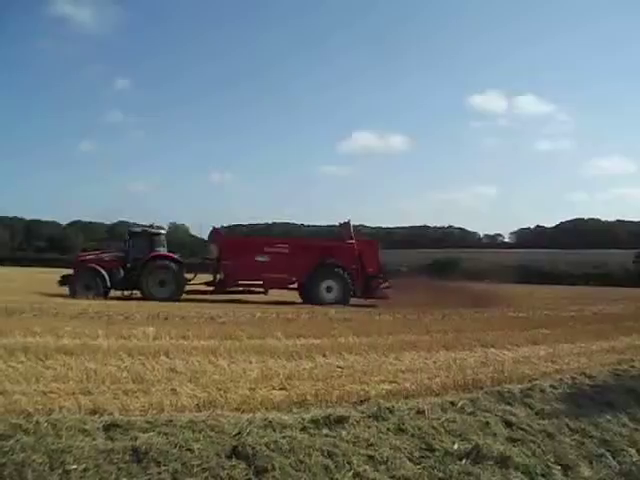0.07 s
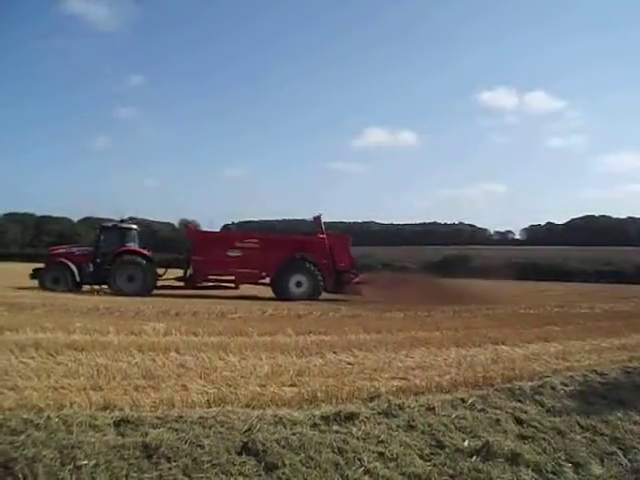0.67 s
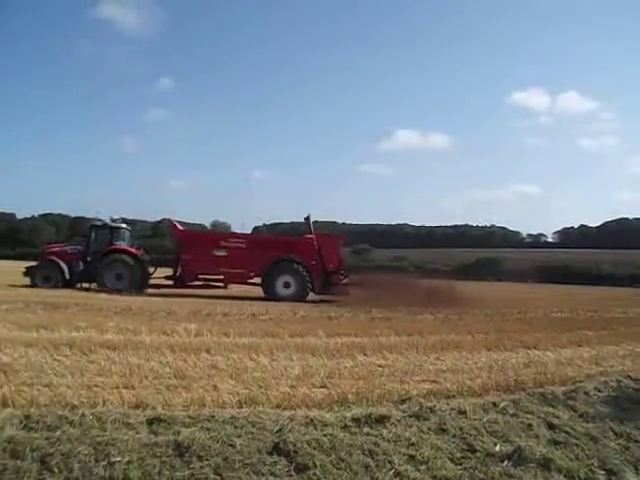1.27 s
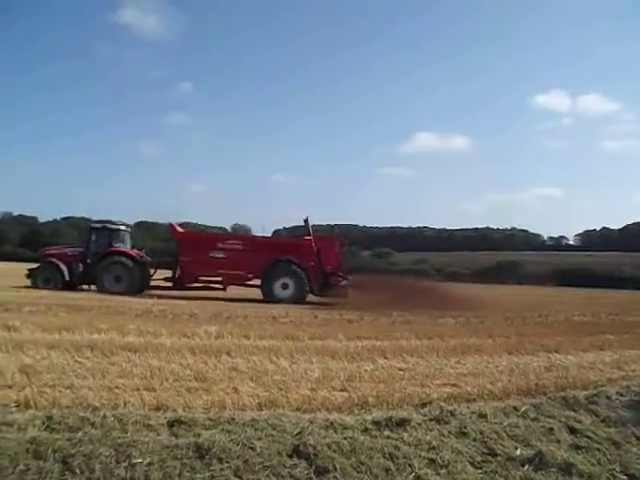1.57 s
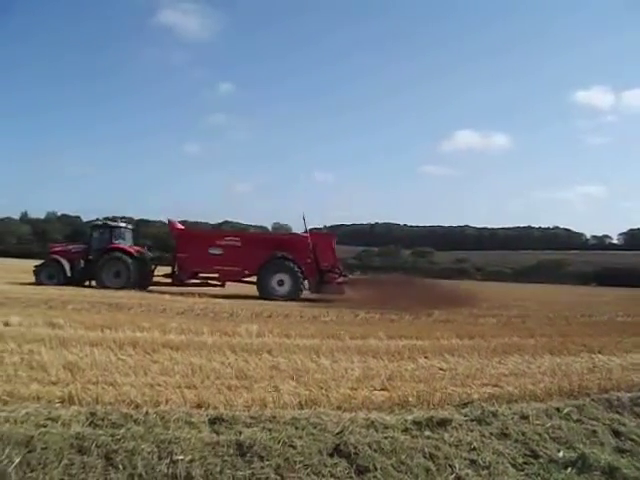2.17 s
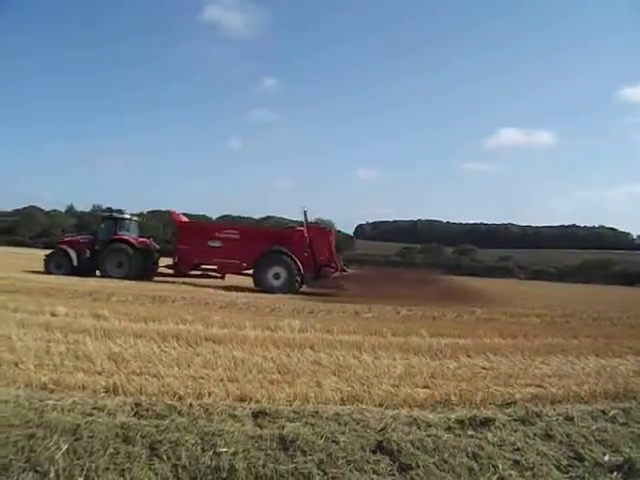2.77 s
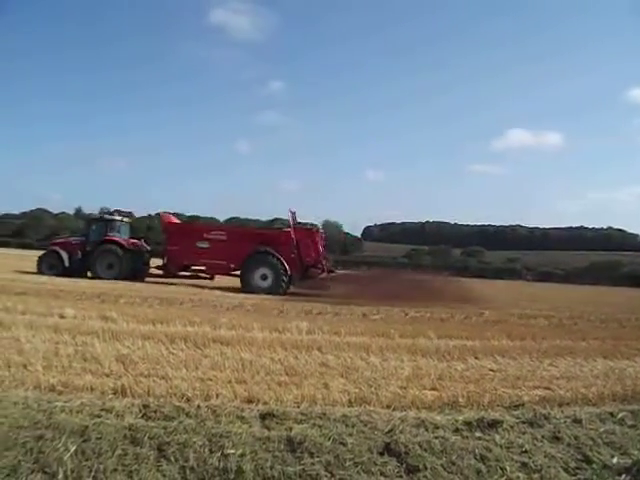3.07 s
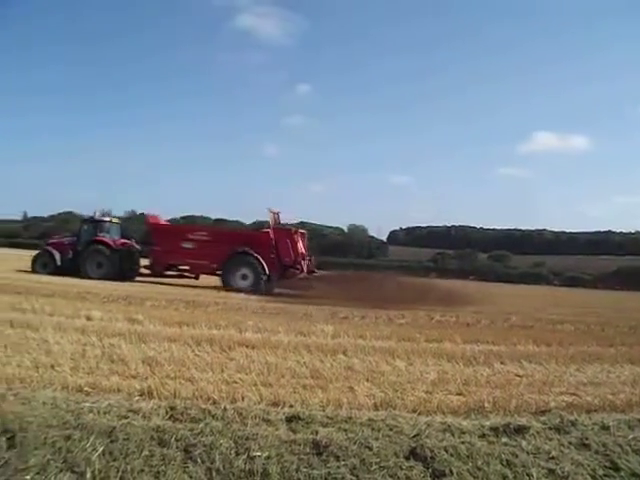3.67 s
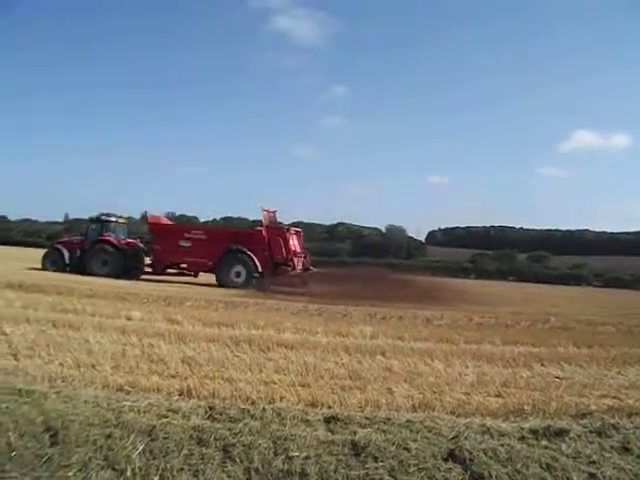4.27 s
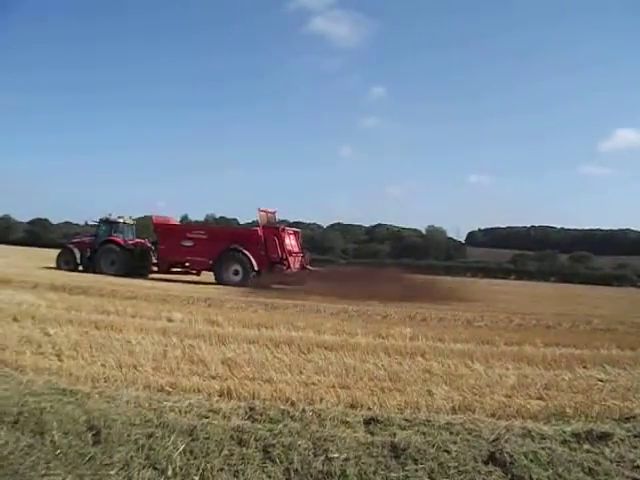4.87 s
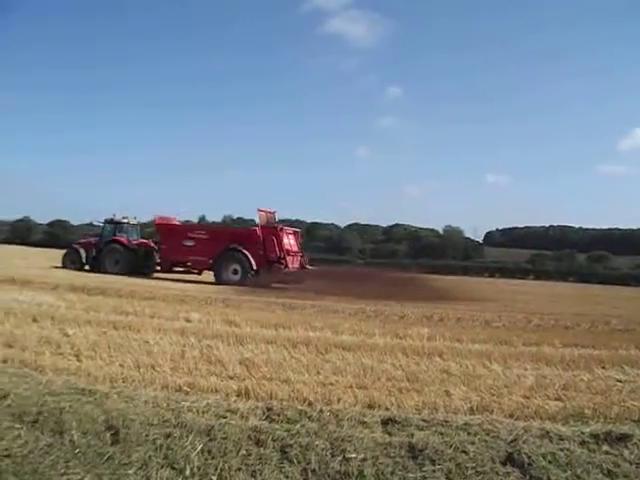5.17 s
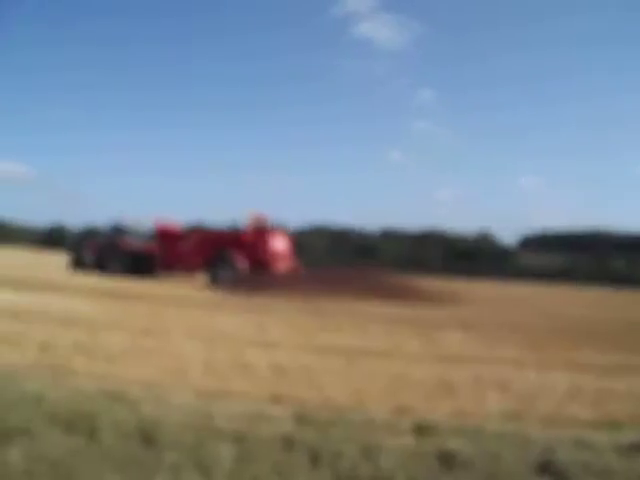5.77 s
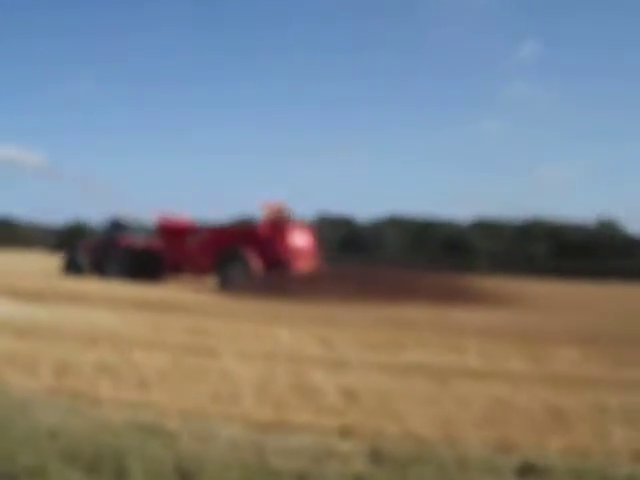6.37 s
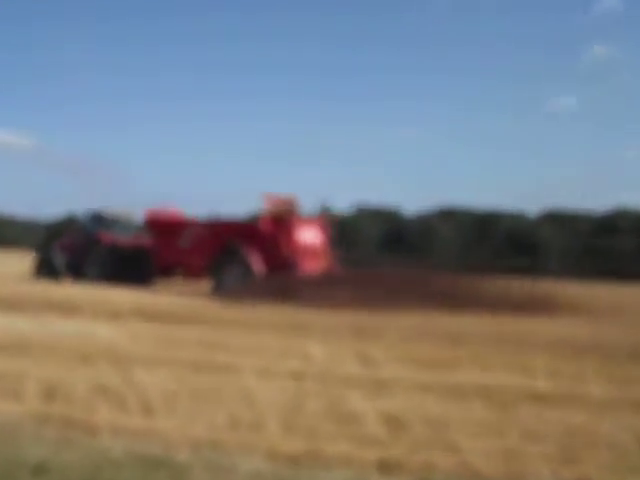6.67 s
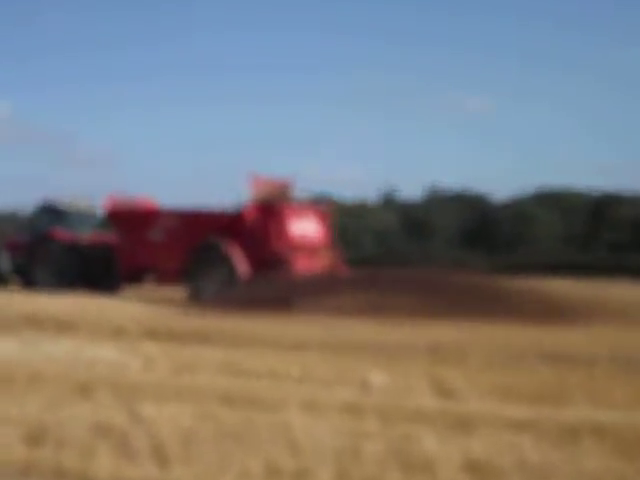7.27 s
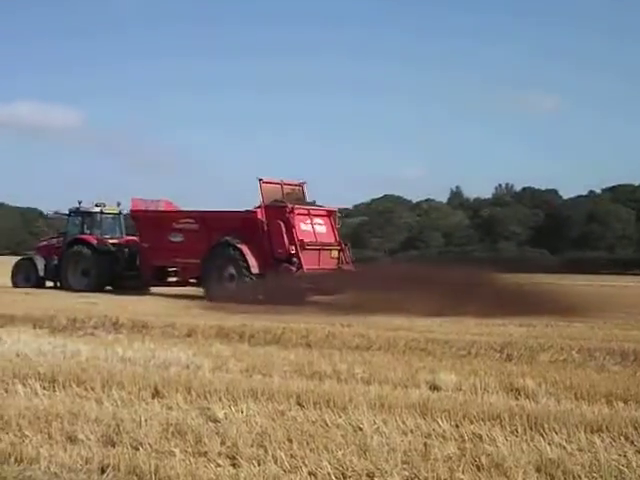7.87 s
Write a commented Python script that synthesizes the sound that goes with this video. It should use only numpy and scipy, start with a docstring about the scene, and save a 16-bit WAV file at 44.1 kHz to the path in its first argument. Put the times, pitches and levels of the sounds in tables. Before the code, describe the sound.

A tractor's diesel drone and a manure spreader's gritty roar carry across a field, with stones clacking on steel and wind on the microphone.

```python
"""A diesel drone and a gritty roar come first: a tractor tows a manure spreader over a stubble field,
about 25 m from the microphone and slowly moving away. The exhaust barks harder as the engine lugs,
gears whine, and the beaters shred the load, now and then striking a stone that makes the steel ring.
Close up, wind buffets the camera's small, dull microphone; late on, the zoom motor hisses faintly
and pebbles tick off the beaters."""
import sys
import numpy as np
from scipy import signal
from scipy.fft import rfft, irfft, next_fast_len
from scipy.io import wavfile

SR = 44100
rng = np.random.default_rng(int(sys.argv[2]) if len(sys.argv) > 2 else 0)


def to_wav(sig):
    """Store sig (one row per channel, or 1-D mono) as 16-bit WAV at the path in sys.argv[1].

    Samples outside -1..1 are clipped; the rate is SR.
    """
    pcm = np.clip(np.atleast_2d(sig), -1, 1) * 32767
    pcm = np.round(pcm).astype(np.int16)
    wavfile.write(sys.argv[1], SR, pcm.T)  # frames by channels


N = 349272
TIME = np.arange(N) / SR


def from_db(db):
    """Decibels to gain."""
    return 10 ** (np.asarray(db) / 20)


def rms_one(x):
    """Scale to unit rms."""
    return x / np.sqrt(np.mean(x ** 2) + 1e-20)


def in_time(rows):
    """Each column of a timed curve at every sample."""
    times, *columns = np.transpose(rows)
    return [np.interp(TIME, times, column) for column in columns]


def running(start_s, end_s, fade_s):
    """Fade in, hold at 1, fade out."""
    return np.clip(np.minimum(TIME - start_s, end_s - TIME) / fade_s, 0, 1)


def decay(age, t60):
    """Fall by 60 dB in t60 seconds."""
    return np.exp(-np.log(1000) * age / t60)


def noise():
    """White noise."""
    return rng.standard_normal(N)


def drift(rate_hz):
    """Smooth random wander of rms 1."""
    hop, settle = 40, 2000
    r = np.exp(-2 * np.pi * rate_hz * hop / SR)
    slow = signal.lfilter([1], [1, -2 * r, r * r], rng.standard_normal(N // hop + settle + 2))[settle:]
    return np.interp(np.arange(N) / hop, np.arange(len(slow)), rms_one(slow))


def butter(x, hz, kind, order=2):
    """Causal Butterworth filter."""
    return signal.sosfilt(signal.butter(order, hz, kind, fs=SR, output="sos"), x + 1e-18)


def coloured(x, spectrum):
    """Give a steady sound a spectrum; rms 1."""
    size = next_fast_len(N)
    hz, db = np.transpose(spectrum)
    bin_hz = np.maximum(np.arange(size // 2 + 1) * SR / size, 1)
    gain = from_db(np.interp(np.log(bin_hz), np.log(hz), db))
    return rms_one(irfft(rfft(x, size) * gain, size)[:N])


def resonate(x, hz, width_hz):
    """A resonance with gain 1 at its top."""
    r = np.exp(-np.pi * width_hz / SR)
    feedback = [1, -2 * r * np.cos(2 * np.pi * hz / SR), r * r]
    return signal.lfilter(np.array([1, 0, -1]) * (1 - r * r) / 2, feedback, x + 1e-18)


def tone(turns, waver_db, wander_rad):
    """A rotating part's tone; moving air over the field makes its level and phase waver."""
    amplitude = np.sqrt(2) * from_db(waver_db * drift(4))
    return amplitude * np.sin(2 * np.pi * (turns + rng.random()) + wander_rad * drift(4.9))


# engine speed, sagging under load and recovering: (time [s], firing rate [Hz])
ENGINE_SPEED = [(0, 82.5), (.4, 78.2), (.8, 75.6), (1.4, 74.3), (2, 74.2), (2.7, 74.8), (3.4, 77.4),
                (4.3, 78.3), (5, 80.9), (6.9, 84.1), (7.92, 82.1)]
# the octave above the firing tone: (time [s], level [dB])
EXHAUST_OCTAVE = [(.1, -35.5), (1.1, -30.5), (2.2, -39.5), (2.8, -27), (3.2, -35), (3.8, -24.8), (5, -23.5),
                  (5.6, -30), (6.3, -26.5), (7.9, -36)]
def exhaust(firings, governed_hz=82, bark_db_per_hz=.42):
    """The further the load drags the engine below its governed speed, the harder the exhaust barks."""
    sag_hz = governed_hz - in_time(ENGINE_SPEED)[0]
    bark = from_db(-25.2 + bark_db_per_hz * sag_hz) * tone(firings, waver_db=.5, wander_rad=.04)
    octave = from_db(in_time(EXHAUST_OCTAVE)[0]) * tone(2 * firings, waver_db=.8, wander_rad=.07)
    return bark + octave


# weaker engine and driveline tones: (frequency [x firing rate], level [dB])
DRIVELINE_ORDERS = [(.53, -34), (1.49, -35), (2.35, -38), (3.86, -46), (7.15, -46), (9.65, -44),
                    (11.4, -45), (15.1, -46), (17.1, -46), (21.4, -46), (36.2, -43), (39.3, -44),
                    (45.3, -48)]
def driveline(firings):
    """Rotating parts hum, all locked to the crankshaft."""
    return sum(from_db(db) * tone(order * firings, waver_db=3, wander_rad=.25 * np.sqrt(order))
               for order, db in DRIVELINE_ORDERS)


def gear_whine(firings, start_s=1.43, end_s=3.08, swell_db_per_s=3):
    """Two gear meshes sing out and swell while the engine lugs hardest, and stay faint otherwise."""
    fast_mesh = tone(29 * firings, waver_db=1.5, wander_rad=1.3)
    fast_mesh *= 1 + .6 * drift(50)  # roughened by backlash
    slow_mesh = from_db(-12) * tone(12 * firings, waver_db=-3.5, wander_rad=.39)
    swell_db = -33.5 + swell_db_per_s * (TIME - start_s)
    singing = from_db(swell_db) * running(start_s, end_s, fade_s=.35)
    return (from_db(-51.5) + singing) * (fast_mesh + slow_mesh)


# the tractor's rumble from across the field: (frequency [Hz], relative level [dB])
RUMBLE_SPECTRUM = [(30, -3), (60, -3), (110, 9), (165, 2.5), (220, -2.5), (300, -8.5), (420, -16.5),
                   (700, -55.5)]
def rumble():
    """Engine block and running gear shake out a steady low noise."""
    return from_db(-24.2) * coloured(noise(), RUMBLE_SPECTRUM)


# hopper resonances: (frequency [Hz], width [Hz], gain [dB])
HOPPER_MODES = [(480, 20, -24), (760, 33, -10.5), (900, 170, -5.5), (1290, 35, -23.5), (2033, 150, -5.5),
                (2940, 22, -15)]
# the spreader's roar from across the field: (frequency [Hz], relative level [dB])
ROAR_SPECTRUM = [(180, -29), (300, -5.5), (400, -4.5), (520, -3.5), (700, -4), (1020, -4.5), (1200, -2),
                 (2090, -1), (2330, -2), (2650, -1.5), (3000, 1.5), (3550, -3.5), (4000, -10.5),
                 (4900, -21), (5500, -34.5), (6200, -55)]
# the beaters as the load feeds in: (time [s], low roar level [dB], bright rasp level [dB])
BEATER_LEVELS = [(.1, -26.5, -23.5), (.65, -24.6, -23), (1.4, -27, -24), (2.3, -28, -25),
                 (2.95, -27, -25.5), (3.4, -27.5, -24), (4.4, -26.5, -23.5), (5.6, -27.5, -22.5),
                 (6.4, -28, -22.5), (7.1, -28, -25), (7.9, -28.7, -28.5)]
def spreader(firings, clods_per_s=700, size_spread_db=2.5, grit_share=.44, knock_depth=.089):
    """Countless clods patter through beaters and hopper; diesel knock pulses in the same roar."""
    sizes = from_db(size_spread_db * np.minimum(rng.exponential(1, N), np.pi))
    signs = rng.choice([-1, 1], N)
    clods = rms_one(sizes * signs * (rng.random(N) < clods_per_s / SR))
    rush = noise() * (1 + knock_depth * np.cos(2 * np.pi * firings))
    drive = rush + grit_share * clods
    hopper = sum(from_db(db + 1.2 * drift(2.2)) * resonate(drive, hz, width_hz)
                 for hz, width_hz, db in HOPPER_MODES)
    roar = coloured(drive + hopper, ROAR_SPECTRUM)
    low_db, rasp_db = in_time(BEATER_LEVELS)
    low = from_db(low_db + .3 * drift(25)) * rms_one(butter(roar, 1582, "low", order=3))
    rasp = from_db(rasp_db + 1.3 * drift(32)) * rms_one(butter(roar, 1593, "high", order=3))
    return low + rasp


# wind right on the microphone: (frequency [Hz], relative level [dB])
WIND_SPECTRUM = [(10, 1), (22, -1), (42, 1), (65, -2.5), (120, -12.5), (300, -16.5), (600, -63)]
# its gusts: (time [s], level [dB], half-width [s])
WIND_GUSTS = [(.3, -34, .15), (.85, -36, 0.096), (3.15, -29.5, 0.18), (4.7, -24.5, 0.051),
              (5.65, -23, 0.12), (5.97, -27, 0.18), (6.7, -27.5, 0.093), (7.13, -24.5, .12),
              (7.57, -25.5, 0.074)]
def wind(breeze_db=-31):
    """Turbulence at the microphone port: a light breeze whose gusts add in power."""
    gust_power = sum(from_db(db) ** 2 * np.exp(-.5 * ((TIME - peak_s) / width_s) ** 2)
                     for peak_s, db, width_s in WIND_GUSTS)
    return np.sqrt(from_db(breeze_db) ** 2 + gust_power) * coloured(noise(), WIND_SPECTRUM)


# modes of the beater steel: (frequency [Hz], relative level [dB], t60 [s])
STEEL_MODES = [(1733, 1, .08), (1890, 3, .09), (2546, -9, .12), (2790, -1, .1), (2988, 0, .19),
               (3215, -3, .16), (3448, -1, .14), (3668, -3, .14), (3919, -2, .08), (4172, -7, .09),
               (4463, -6, .11), (4743, -4, .1)]
# stones on the beaters, as they reach the microphone: (time [s], clack level [dB], clack pitch [Hz],
# scatter level [dB], scatter centre [Hz], ring level [dB], ring centre [Hz])
STONE_STRIKES = [(0.458, -4, 2270, -9.5, 3300, -23, 3800), (3.1191, 0, 2150, -7.5, 1850, -7, 2900),
                 (3.136, -2, 1990, -10.5, 1700, -15.5, 3400), (3.4694, -2.5, 1900, -13.5, 2000, -12, 4000),
                 (4.2515, -13.5, 1890, -13.5, 1300, -40, 2000), (4.576, -9, 1670, -10.5, 1380, -25, 1700),
                 (5.2393, -1.5, 2110, -30.5, 2600, -44, 3000), (5.4237, -6.5, 1708, -8, 1800, -24.5, 4250),
                 (6.041, -15, 3100, -37, 2900, -29, 3000), (6.1115, -10.5, 2150, -29, 2400, -45, 3000),
                 (6.3663, -14, 2000, -25, 2400, -43, 3000), (6.3867, -13.5, 2290, -22, 2400, -47, 3000),
                 (7.128, -17, 3100, -22.5, 3700, -44, 4200), (7.2991, -18.5, 4140, -27, 3900, -44, 4170),
                 (7.475, -16, 2100, -28, 2400, -43, 3000)]
def stones(fragments_per_s=5000, scatter_cycles=122, ring_rise_s=.009, ring_span_hz=1300):
    """A hard clack, a scatter of fragments against the hopper, and the ring of the steel."""
    out, age = np.zeros(N), TIME[:SR // 2]
    for start_s, clack_db, clack_hz, scatter_db, scatter_hz, ring_db, ring_hz in STONE_STRIKES:
        crack = rms_one(resonate(rng.standard_normal(len(age)), hz=3100, width_hz=2100))
        clack = (.93 * np.sin(2 * np.pi * clack_hz * age) + .33 * crack) * decay(age, t60=.019)
        fragments = rng.choice([-1, 1], len(age)) * (rng.random(len(age)) < fragments_per_s / SR)
        scatter = rms_one(butter(resonate(fragments, scatter_hz, width_hz=1400), 610, "high"))
        scatter *= decay(age, t60=scatter_cycles / scatter_hz)
        scatter *= 1 - np.exp(-age / .0013)  # the fragments arrive just after the blow
        ring = np.zeros(len(age))
        for hz, db, t60 in STEEL_MODES:
            # where the stone lands decides which modes speak most
            weight = from_db(db) / (1 + ((hz - ring_hz) / ring_span_hz) ** 2)
            ring += weight * np.sin(2 * np.pi * (hz * age + rng.random())) * decay(age, t60)
        ring *= 1 - np.exp(-age / ring_rise_s)
        hit = from_db(clack_db) * clack + from_db(scatter_db) * scatter + from_db(ring_db) * ring
        at = round(start_s * SR)
        out[at:at + len(age)] += hit[:N - at]
    return butter(out, 4135, "low", order=10)


# the zoom motor, right beside the microphone: (frequency [Hz], relative level [dB])
ZOOM_SPECTRUM = [(3000, -25.5), (4200, -2.5), (4650, -7), (4950, -0.5), (5150, -2.5), (5480, -21),
                 (5800, -17.5), (6100, -27.5), (6400, -55.5)]
def zoom_motor():
    """The lens drive runs once, hissing thinly through the camera body."""
    hiss = from_db(-49 + 2.3 * drift(25)) * coloured(noise(), ZOOM_SPECTRUM)
    return running(start_s=5.58, end_s=7.31, fade_s=.044) * hiss


# wind hitting the microphone port: (time [s], level [dB], half-width [s], thump pitch [Hz])
WIND_BUFFETS = [(5.61, -20, .035, 75), (5.693, -11, .005, 210), (5.697, -15, .014, 95),
                (5.73, -17, .007, 230), (5.781, -17, .013, 140), (5.939, -11, .008, 140),
                (5.944, -14, .014, 65), (5.987, -16, .022, 80), (7.55, -20.5, .035, 140)]
def buffets(eddy_cutoff_ratio=1.86):
    """Each buffet is one pressure swing inside a puff of eddies."""
    out = np.zeros(N)
    eddies = butter(noise(), 30, "high")
    for peak_s, db, width_s, thump_hz in WIND_BUFFETS:
        swell = np.exp(-.5 * ((TIME - peak_s) / width_s) ** 2)
        puff = swell * butter(eddies, eddy_cutoff_ratio * thump_hz, "low", order=4)
        puff *= np.sqrt(np.sum(swell ** 2) / np.sum(puff ** 2))
        angle = 2 * np.pi * thump_hz * (TIME - peak_s)
        thump = angle * np.exp(-.5 * angle ** 2)
        out += from_db(db) * (.62 * puff + 1.8 * thump)
    return out


# pebbles heard while the beaters swing round to face the microphone: (frequency [Hz], level [dB])
PINGS = [(2100, -23), (2400, -23), (3100, -22), (3500, -24)]
def pebbles(start_s=5.9, end_s=7.3, pebbles_per_s=22, contact_s=.0008):
    """Small stones glance off the beaters at random, each with one short ping."""
    out, age = np.zeros(N), TIME[:SR // 10]
    flying = (TIME > start_s) & (TIME < end_s)
    envelope = (1 - np.exp(-age / contact_s)) * decay(age, t60=.036)
    for hz, db in PINGS:
        strikes = flying * (rng.random(N) < pebbles_per_s / len(PINGS) / SR)
        ping = envelope * np.sin(2 * np.pi * hz * age)
        out += signal.fftconvolve(from_db(db) * strikes, ping)[:N]
    return out


def scene():
    """Tractor and spreader recede over the open field; wind and lens sound at the microphone."""
    start_m, away_m_per_s = 24.5, 2.58
    nearness = start_m / (start_m + away_m_per_s * TIME)
    firings = np.cumsum(in_time(ENGINE_SPEED)[0]) / SR  # running count of cylinder firings
    roar = spreader(firings)
    tractor = exhaust(firings) + driveline(firings) + gear_whine(firings) + rumble()
    rig = nearness * (tractor + roar)  # their levels hold at the starting distance
    return (rig + stones() + wind() + buffets() + zoom_motor() + pebbles())[None]


def limiter(x, threshold_db, release_db_per_s, attack_s):
    """Peaks over the threshold pull the gain down; it creeps back afterwards."""
    over_db = np.maximum(20 * np.log10(np.abs(x) + 1e-9) - threshold_db, 0)
    release_db = release_db_per_s * TIME
    held_db = np.maximum.accumulate(over_db + release_db, axis=-1) - release_db
    # the gain follows with a short lag, so the first edge of a hit gets through
    r = np.exp(-1 / (attack_s * SR))
    return x * from_db(-signal.lfilter([1 - r], [1, -r], held_db))


def record(dry):
    """A dull little mono microphone that switches on abruptly, ducks and clips on the hardest hits."""
    switch_on_s, mic_top_hz, cutoff_hz = .072, 5950, 16600
    live = dry * (TIME >= switch_on_s)
    dull = signal.sosfilt(signal.cheby1(10, .3, mic_top_hz, fs=SR, output="sos"), live)
    limited = limiter(dull, threshold_db=-1.5, release_db_per_s=30, attack_s=.004)
    clipped = butter(np.clip(limited, -.74, .74), 10000, "low", order=1)
    return signal.sosfilt(signal.cheby2(12, 70, cutoff_hz, fs=SR, output="sos"), clipped)


dry = scene()
out = record(dry)
to_wav(out)
```